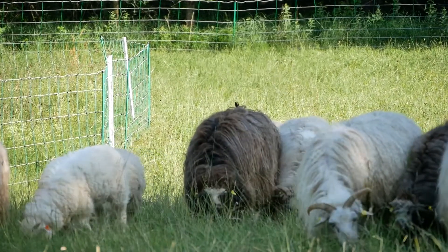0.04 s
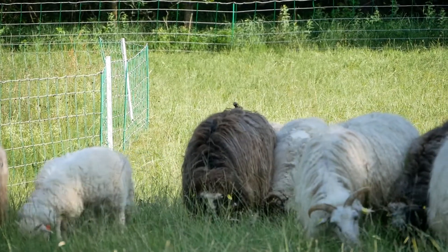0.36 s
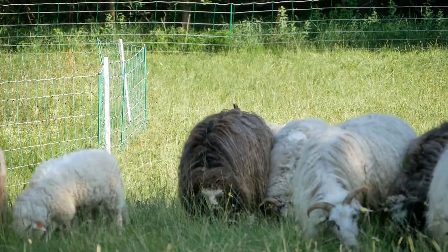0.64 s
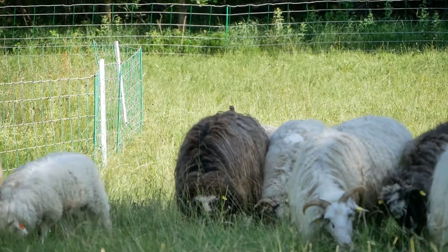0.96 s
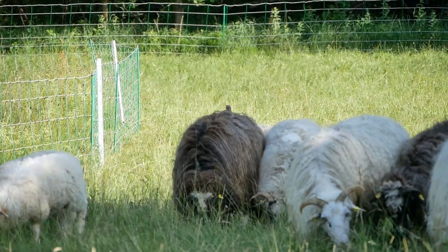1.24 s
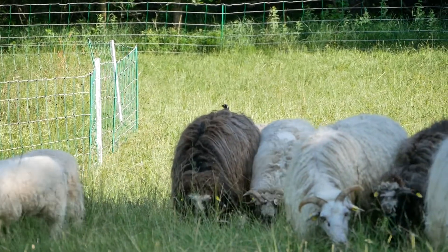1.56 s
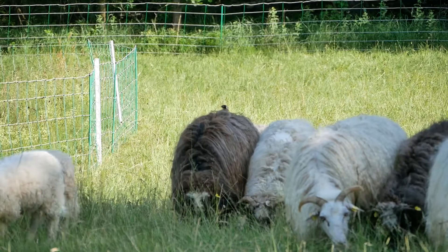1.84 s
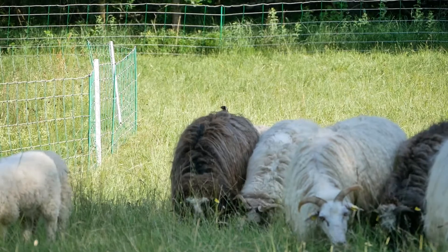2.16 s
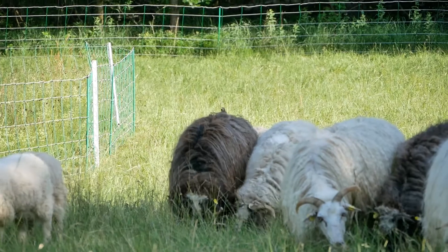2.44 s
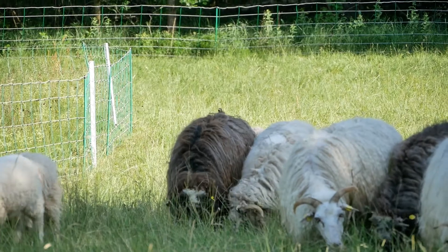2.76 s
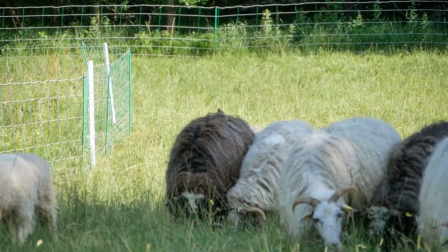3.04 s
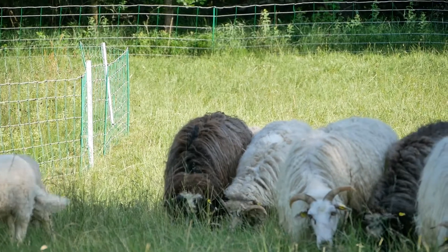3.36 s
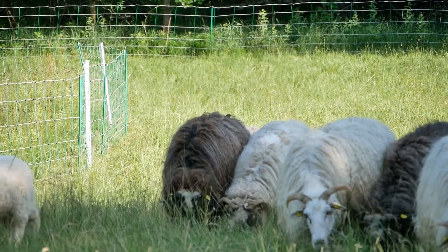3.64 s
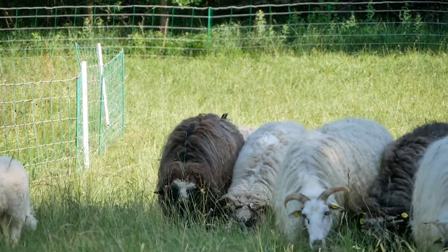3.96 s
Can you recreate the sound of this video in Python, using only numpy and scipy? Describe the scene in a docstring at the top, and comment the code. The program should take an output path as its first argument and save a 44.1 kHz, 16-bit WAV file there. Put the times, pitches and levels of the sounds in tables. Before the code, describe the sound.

A sheep gives one short, quavering bleat at the end. Before it, louder wind gusts rumble and thump on the microphone in a meadow, while a faint bird whistles and grass tears softly over a steady hiss of leaves.

```python
"""Sheep in a windy meadow

A sheep bleats at the edge of a wood, its voice a quavering buzz that rings in the throat.
Before it, gusts rumble and thump on the microphone, a songbird whistles among the trees
and the flock tears at the grass in short crackles, all over a steady hiss of leaves."""
import sys
import numpy as np
from scipy import signal
from scipy.fft import rfft, irfft
from scipy.io import wavfile
from scipy.ndimage import uniform_filter1d

SR = 44100
rng = np.random.default_rng(int(sys.argv[2]) if len(sys.argv) > 2 else 0)


def bounce(signal):
    """Save signal as a 16-bit WAV file at the path given by the first command-line argument."""
    frames = np.transpose(np.atleast_2d(signal))
    limited = np.clip(frames, -1, 1)
    pcm = np.round(limited * 32767).astype(np.int16)
    wavfile.write(sys.argv[1], SR, pcm)


N = 176400
T, HZ = np.arange(N) / SR, np.fft.rfftfreq(N, 1 / SR)

# Stereo width of grass and leaves. Each row: frequency in Hz, left-right correlation.
MEADOW_LIKENESS = [(200, 0.64), (600, 0.33), (1200, 0.15), (2500, 0.61), (4500, 0.86), (8000, 0.93),
                   (12000, 0.71)]


def sheep():
    """Uneven vocal pulses and puffs of rasp ring the throat; each quaver lifts pitch and effort."""
    # The bleat's shake. Each row: crest time in seconds, pitch in Hz, effort in dB,
    # drop between quavers in dB, swell time in seconds.
    quavers = [(3.657, 319.4, -45, 18, .022), (3.737, 333, -39.5, 17.5, 0.028),
               (3.816, 343.8, -41, 4, 0.042), (3.884, 355.6, -37.5, 14.5, 0.036),
               (3.958, 349.5, -44, 7, 0.0355), (4.02, 354, -44, 3, 0.031)]
    # Resonances of the open throat. Each row: frequency in Hz, gain in dB.
    throat = [(300, -16.5), (690, -14.5), (1010, 2), (1370, -1.5), (1700, -21.5), (2070, -4), (2220, -13),
              (2480, -1), (2750, -8), (3150, -18.5), (3550, -11), (3850, -4), (4300, -12), (5200, -11.5),
              (5900, -20.5), (6500, -45)]
    # Tone of the breathy rasp. Each row: frequency in Hz, relative level in dB.
    rasp_tone = [(300, -15), (800, -6), (1150, -15), (1700, -5), (2500, 2), (3200, -3), (3900, 0),
                 (5400, -3), (6500, -11.5), (13000, -33)]
    # Where the bleat sits. Each row: frequency in Hz, left over right in dB.
    pan = [(500, -10), (1150, -5), (2200, -5), (3800, 2)]
    start_s, onset_s, fall_s = 3.62, .015, .016
    pitch_sag, jitter, shimmer = .078, .003, .22
    treble_hz, treble_follow = 1700, .57
    crests, top_hz, top_db, drop_db, swell_s = np.transpose(quavers)
    arches = [np.exp(-((T - s) / np.where(T < s, swell, fall_s)) ** 2)
              for s, swell in zip(crests, swell_s)]
    lift = np.max(arches, axis=0)
    hz = np.interp(T, crests, top_hz) * (1 - pitch_sag * (1 - lift)) * (1 + jitter * wander(hz=143))
    effort = amp(np.interp(T, crests, top_db) - np.interp(T, crests, drop_db) * (1 - lift))
    # The nasal treble stays strong between quavers.
    treble_effort = effort.max() * (effort / effort.max()) ** treble_follow
    phase = 2 * np.pi * np.cumsum(hz) / SR
    pulses = sum(amp(1.8 * wander(hz=16)) * np.cos(k * phase + .09 * k ** 2 + .25 * wander(hz=40))
                 for k in np.arange(1, 23))
    vowel = ring(pulses * (1 + shimmer * wander(hz=220)), throat)
    vowel /= vowel[T > start_s].std()
    body = irfft(rfft(vowel) / (1 + (HZ / treble_hz) ** 10), N)
    rasp = unit(colour(rng.standard_normal(N) * (1 + .5 * np.cos(phase)), rasp_tone))
    voice = amp(-1.2) * (effort * body + treble_effort * (vowel - body))
    voice += amp(-14) * treble_effort * rasp
    voice *= np.clip((T - start_s) / onset_s, 0, 1)
    return place(voice + amp(-14) * wood_echo(voice), pan)


def wind():
    """Turbulence rumbles on the microphone and grows brighter as it blows harder."""
    # Puffs of wind. Each row: start in seconds, length in seconds, relative level in dB.
    puffs = [(.24, 0.086, -43), (.345, 0.059, -30.5), (.45, 0.15, -34.5), (.625, 0.063, -28),
             (.88, 0.098, -33), (1.08, 0.11, -31.5), (1.27, 0.05, -37), (1.355, 0.058, -31.5),
             (1.48, 0.051, -37.5), (1.55, 0.088, -30.5), (1.933, 0.069, -24), (1.975, 0.09, -21),
             (2.06, 0.065, -26.5), (2.12, 0.06, -29.5), (2.19, 0.049, -21.5), (2.23, 0.07, -27.5),
             (2.29, 0.064, -27.5), (2.385, 0.037, -28.5), (2.44, 0.084, -27), (2.52, 0.19, -34.5),
             (2.603, 0.071, -22), (2.655, 0.088, -20), (2.72, 0.15, -29), (2.82, 0.097, -31),
             (2.9, 0.1, -21.5), (2.99, 0.084, -24), (3.055, 0.087, -26.5), (3.15, 0.061, -25),
             (3.22, 0.062, -26.5), (3.28, 0.076, -29), (3.375, 0.056, -33), (3.48, 0.06, -33.5),
             (3.56, 0.084, -33.5), (3.79, 0.15, -41)]
    # Tone of light and of strong wind. Each row: frequency in Hz, relative level in dB.
    light_tone = [(20, -33), (50, -15.5), (85, 0.5), (120, 1.5), (200, -5.5), (300, -20), (450, -37),
                  (800, -38.5), (1600, -84)]
    strong_tone = [(20, -44), (50, -41), (90, -3), (140, 7), (300, 1.5), (400, -9), (550, -16.5),
                   (800, -26), (1600, -69)]
    # The wind's lean. Each row: frequency in Hz, left over right in dB.
    pan = [(100, .1), (200, 0.34), (360, 6.4), (700, 4.4)]
    # Its width. Each row: frequency in Hz, left-right correlation.
    likeness = [(110, 0.95), (200, 0.89), (350, 0.61), (700, 0.16)]
    lull_db, light_db, strong_db, sputter_db = -48.5, -34.5, -22, 3.5
    force = amp(-2) * swells(puffs) + amp(lull_db + 3.4 * wander(hz=12.4))
    hardness = np.clip((20 * np.log10(force) - light_db) / (strong_db - light_db), 0, 1)
    air = place(noise_pair(likeness), pan) * amp(sputter_db * wander(hz=56.2))
    eddies = (1 - hardness) * unit(colour(air, light_tone)) + hardness * unit(colour(air, strong_tone))
    running_rms = np.sqrt(uniform_filter1d((eddies ** 2).mean(0), size=1300))
    return force * eddies / running_rms


def buffets():
    """Single eddies slap the microphone, each with one swing of pressure."""
    # Thumps within the gusts. Each row: centre in seconds, envelope height in dB, pitch in Hz.
    thumps = [(1.947, -13, 333), (2.015, -7.5, 415), (2.034, -9, 310), (2.094, -10, 223), (2.264, -17, 255),
              (2.302, -17, 257), (2.333, -10.5, 287), (2.341, -12, 196), (2.616, -11, 148),
              (2.672, -15.5, 384), (2.678, -7.5, 390), (2.688, -6.5, 235), (2.703, -13.5, 500),
              (3.011, -4, 335), (3.071, -15, 250), (3.186, -18.5, 320)]
    width_cycles, split_hz, right_gain, lag_s = .32, 223, .29, .00062
    left = np.zeros(N)
    for s, db, hz in thumps:
        cycles = (T - s) * hz
        left += amp(db) * np.exp(-.5 * (cycles / width_cycles) ** 2) * np.sin(2 * np.pi * cycles)
    # Bass hits both sides; small quick eddies reach the right weakly and late.
    bass = 1 / (1 + (HZ / split_hz) ** 4)
    to_right = bass + (1 - bass) * right_gain * np.exp(-2j * np.pi * HZ * lag_s)
    return np.array([left, irfft(rfft(left) * to_right, N)])


def bird():
    """Gliding, warbling whistles linger among the trees."""
    # The song. Each row: start and length in seconds, the glide's first and last pitch in Hz,
    # relative level in dB, warble depth as a share of pitch.
    notes = [(0.0, 0.069, 2000, 1890, -54, 0.011), (0.07, 0.099, 1932, 1847, -59, 0.026),
             (0.594, 0.048, 1997, 1975, -56, 0.0065), (0.74, 0.043, 2670, 2650, -59.5, .002),
             (0.868, 0.095, 2100, 1915, -60.5, 0.036), (0.988, 0.081, 1815, 1658, -57, .003),
             (1.035, 0.043, 4330, 4370, -62, .002), (1.3, 0.043, 1530, 2150, -51.5, 0.026),
             (1.332, 0.066, 2110, 2162, -50, 0.014), (1.33, 0.081, 1850, 1820, -63, 0.013),
             (1.347, 0.036, 3930, 3820, -58, 0.0092), (1.403, 0.024, 1680, 2130, -53.5, 0.009),
             (1.433, 0.083, 2150, 2140, -47.5, 0.022), (1.492, 0.07, 2160, 2170, -47.5, 0.051),
             (1.565, 0.12, 2140, 2150, -53.5, 0.024), (1.593, 0.1, 1766, 1825, -58.5, 0.019),
             (1.72, 0.21, 2170, 2242, -60, 0.032), (1.845, 0.11, 2500, 2820, -60, 0.09),
             (2.448, 0.043, 3850, 3770, -57.5, .016), (2.51, 0.12, 2030, 2035, -58, 0.0027),
             (2.554, 0.098, 3130, 3044, -53.5, 0.0045), (2.803, 0.096, 1990, 1952, -56.5, 0.0044),
             (2.81, 0.0305, 5300, 4470, -58.5, 0.016), (2.836, 0.053, 4530, 4380, -61.5, .009),
             (2.892, 0.077, 1915, 1898, -49, 0.007), (2.93, 0.085, 3910, 3870, -61, 0.006),
             (2.97, 0.11, 2145, 2080, -51.5, 0.013), (3.061, 0.109, 1926, 2005, -54.5, 0.04),
             (3.061, 0.13, 3100, 2920, -58.5, 0.034), (3.24, 0.048, 2500, 2680, -47, 0.0036),
             (3.272, .045, 2660, 2538, -46, 0.0026), (3.601, 0.1, 2565, 2683, -54.5, 0.016),
             (3.747, 0.076, 2508, 2650, -55, 0.031)]
    warble_hz, fade_s, arch_depth = 64.63, .01, .014
    flutter = wander(hz=warble_hz * 2) / 2 + np.sin(2 * np.pi * warble_hz * T)
    song = np.zeros(N)
    for s, length, first_hz, last_hz, db, warble in notes:
        on = (T >= s) & (T < s + length)
        t = T[on] - s
        glide = first_hz + (last_hz - first_hz) * t / length
        hz = glide * (1 + warble * flutter[on] + arch_depth * (np.sin(np.pi * t / length) - .5))
        fade = np.clip(np.minimum(t, length - t) / fade_s, 0, 1)
        song[on] += amp(db) * fade * np.sqrt(2) * np.sin(2 * np.pi * np.cumsum(hz) / SR)
    return amp(-1.55) * song + amp(-6) * wood_echo(song)


def grazing():
    """Each bite snaps a tuft of blades in a dense crackle."""
    # Bites. Each row: start in seconds, length in seconds, level in dB.
    bites = [(.345, 0.037, -57), (1.09, 0.046, -55.5), (1.68, 0.13, -61), (3.255, 0.044, -51.5),
             (3.405, 0.044, -51)]
    # Tone of tearing grass. Each row: frequency in Hz, relative level in dB.
    grass_tone = [(400, -47), (1300, 6), (2200, -11), (3800, 1.5), (5200, 0.5), (7000, -11), (11000, -24),
                  (14000, -40)]
    snaps = noise_pair(MEADOW_LIKENESS) * amp(5.2 * wander(hz=600))
    return swells(bites) * unit(colour(snaps, grass_tone))


def leaves():
    """Leaves and distant air make a steady hiss with faint drifting patches."""
    # Tone of the hiss. Each row: frequency in Hz, relative level in dB.
    hiss_tone = [(100, -4), (250, 2), (500, 1.5), (850, -2), (1500, -6), (2050, -6), (2900, -8),
                 (4500, -9.5), (5500, -12.5), (7500, -22), (10800, -25), (12500, -35.5), (14000, -48)]
    patch_db = 1.4
    bands = signal.stft(colour(noise_pair(MEADOW_LIKENESS), hiss_tone), nperseg=512)[2]
    patches = uniform_filter1d(rng.standard_normal(bands.shape[1:]), size=9, axis=0)
    patches = unit(uniform_filter1d(patches, size=14, axis=1))
    hiss = signal.istft(bands * amp(patch_db * patches), nperseg=512)[1][:, :N]
    return amp(-52.5) * unit(hiss)


def wood_echo(x):
    """Trees scatter the sound into a stereo tail whose treble dies first."""
    # Decay of the wood. Each row: frequency in Hz, seconds to fall by 60 dB.
    decay = [(300, 0.76), (2200, 0.92), (6000, 0.26)]
    echoes_per_s, predelay_s = 2000, .012
    taps = rng.standard_normal((2, SR)) * (rng.random((2, SR)) < echoes_per_s / SR)
    hz, t, bands = signal.stft(taps * (T[:SR] > predelay_s), SR, nperseg=256)
    tail = signal.istft(bands * amp(-60 * t / spectrum(decay, hz)[:, None]), SR, nperseg=256)[1]
    tail = tail + .48 * tail[::-1]  # each side bleeds into the other
    return signal.fftconvolve(x[None], tail / np.linalg.norm(tail[0]), axes=1)[:, :N]


def amp(db):
    """Decibels to gain."""
    return 10 ** (np.asarray(db) / 20)


def unit(x):
    """Scales to rms 1."""
    return x / np.sqrt(np.mean(x ** 2) + 1e-20)


def spectrum(points, hz=HZ):
    """Reads a table along log frequency."""
    f, value = np.transpose(points)
    return np.interp(np.log(hz + 1), np.log(f + 1), value)


def colour(x, points):
    """Equalises by a table of dB."""
    return irfft(rfft(x) * amp(spectrum(points)), N)


def ring(x, points):
    """Equalises with minimum phase, so resonances ring after each pulse."""
    log_gain = np.log(amp(spectrum(points, abs(np.fft.fftfreq(N, 1 / SR)))))
    return irfft(rfft(x) * np.exp(signal.hilbert(log_gain).conj())[:len(HZ)], N)


def place(x, points):
    """Pans each frequency left or right."""
    side = spectrum(points) / 2
    return irfft(rfft(x) * amp([side, -side]), N)


def noise_pair(likeness):
    """White noise in two partly alike channels."""
    same = np.clip(spectrum(likeness), -1, 1)
    mid, side = rfft(rng.standard_normal((2, N))) * np.sqrt([(1 + same) / 2, (1 - same) / 2])
    return irfft(np.array([mid + side, mid - side]), N)


def wander(hz):
    """Random drift of rms 1, rolling off above the given rate."""
    return unit(irfft(rfft(rng.standard_normal(N)) / (1 + (HZ / hz) ** 4), N))


def swells(rows):
    """One smooth arch of gain for each row."""
    return sum(amp(db) * np.sin(np.pi * np.clip((T - s) / length, 0, 1)) for s, length, db in rows)


def scene():
    """The meadow, with the wind on the microphone in front of it."""
    # The meadow's fader dips briefly during the strongest gust. Each row: time in seconds, gain in dB.
    fader = [(1.95, 4.5), (2.06, 2.5), (2.61, 3), (2.635, -3.5), (2.73, -4.5), (2.81, 2), (3.15, 1.5),
             (3.3, 3.5)]
    meadow = sheep() + bird() + grazing() + leaves()
    return meadow * amp(np.interp(T, *np.transpose(fader))) + wind() + buffets()


def record(dry):
    """A narrow notch in the treble, a low cut and a steep high cut."""
    notch_hz, notch_width_hz, notch_depth = 7880, 110, .8
    low_cut_hz, high_cut_hz = 41, 13100
    notch = 1 - notch_depth * np.exp(-((HZ - notch_hz) / notch_width_hz) ** 2)
    low_cut = signal.butter(2, low_cut_hz, "high", fs=SR, output="sos")
    high_cut = signal.firwin(255, high_cut_hz, window=("kaiser", 9), fs=SR)
    notched = irfft(rfft(dry) * notch, N)
    return signal.oaconvolve(signal.sosfilt(low_cut, notched), high_cut[None], "same")


dry = scene()
out = record(dry)
bounce(out)
```